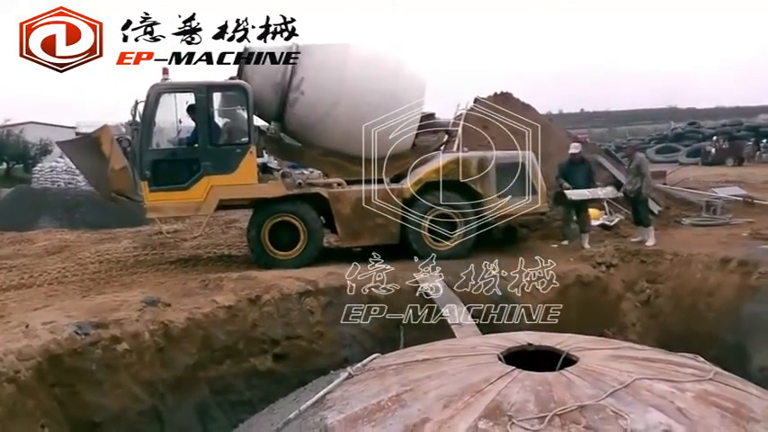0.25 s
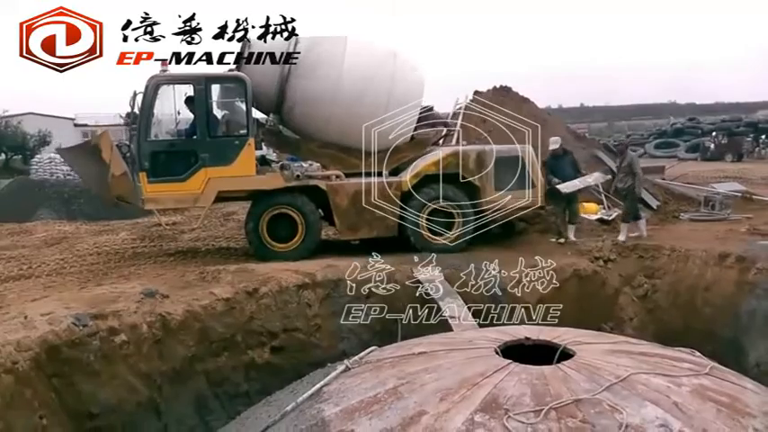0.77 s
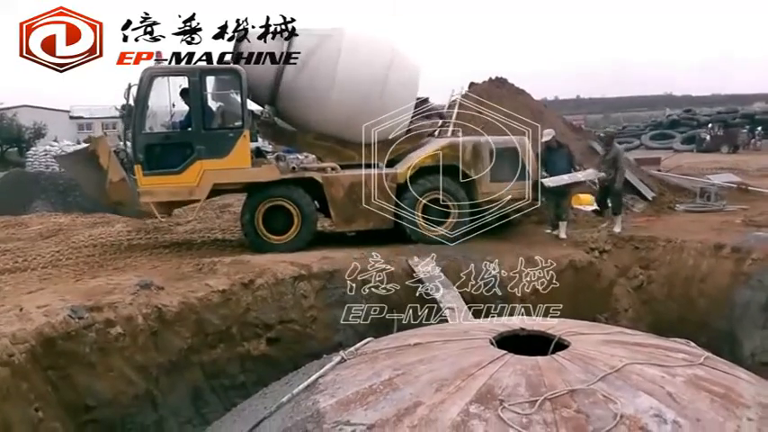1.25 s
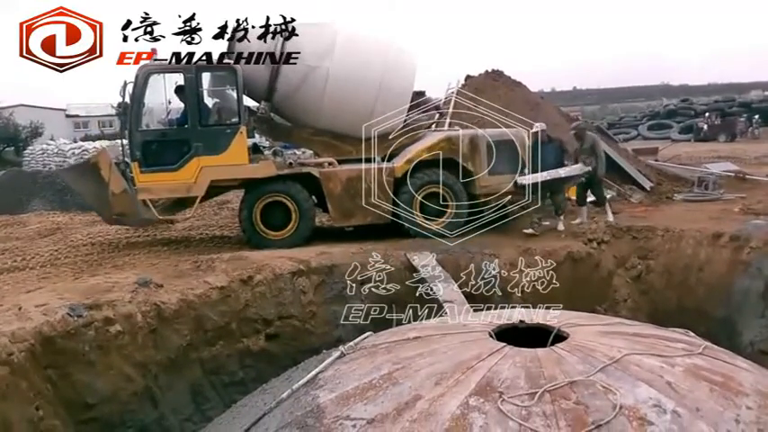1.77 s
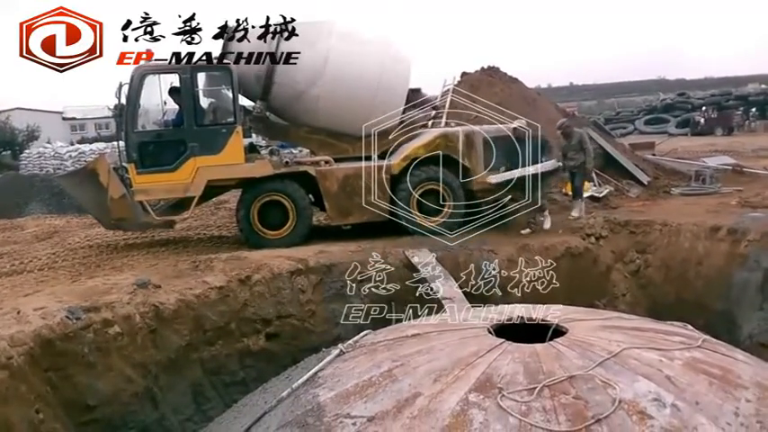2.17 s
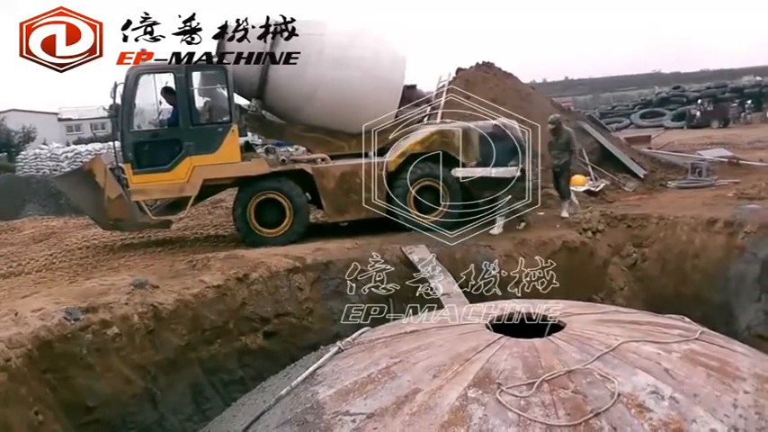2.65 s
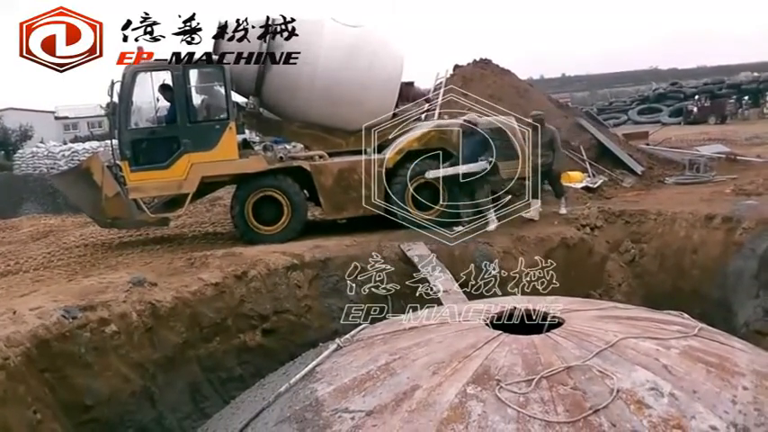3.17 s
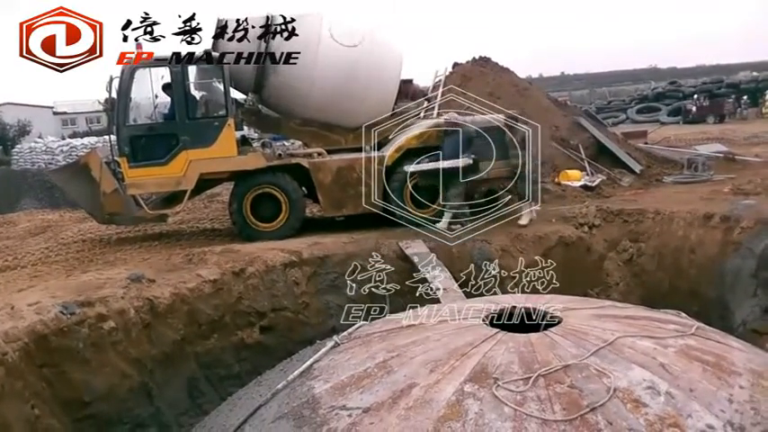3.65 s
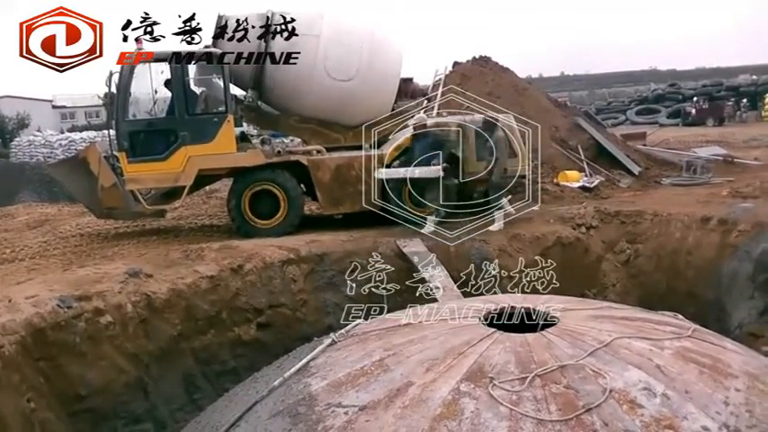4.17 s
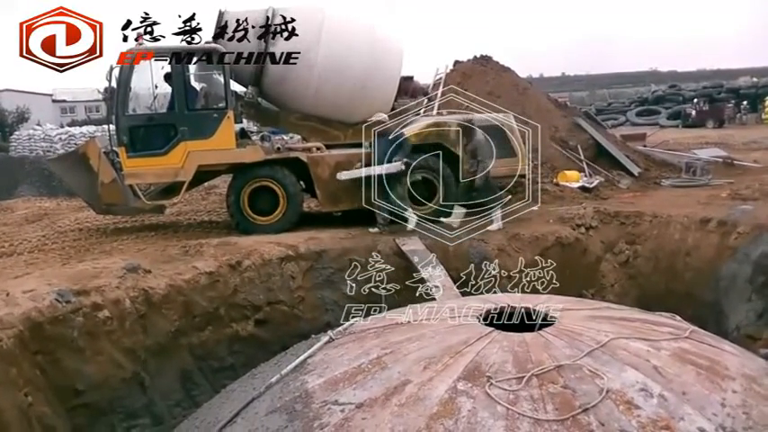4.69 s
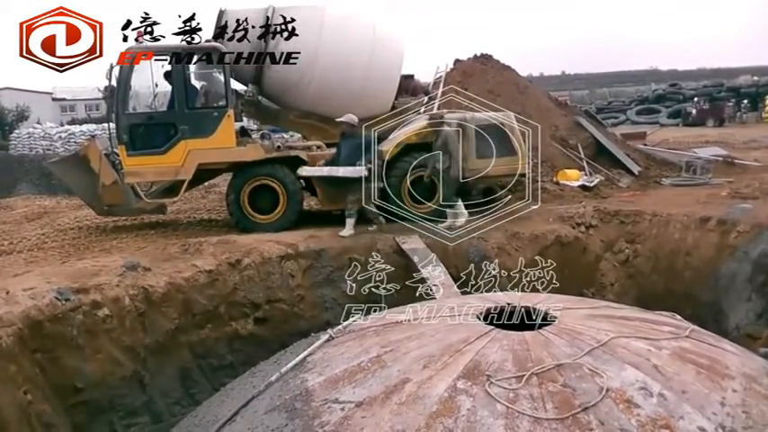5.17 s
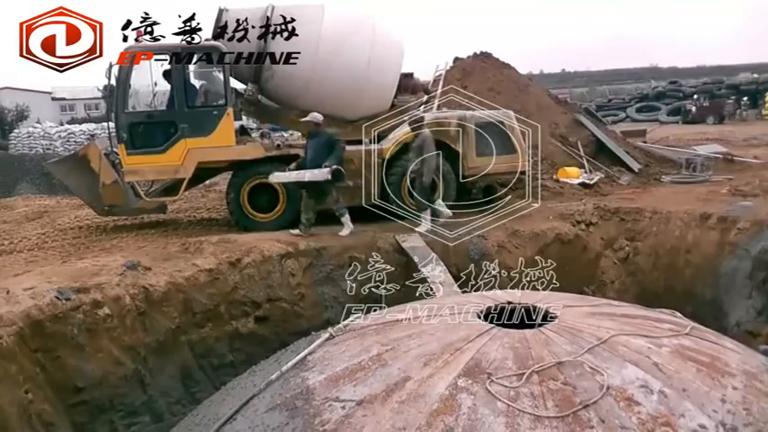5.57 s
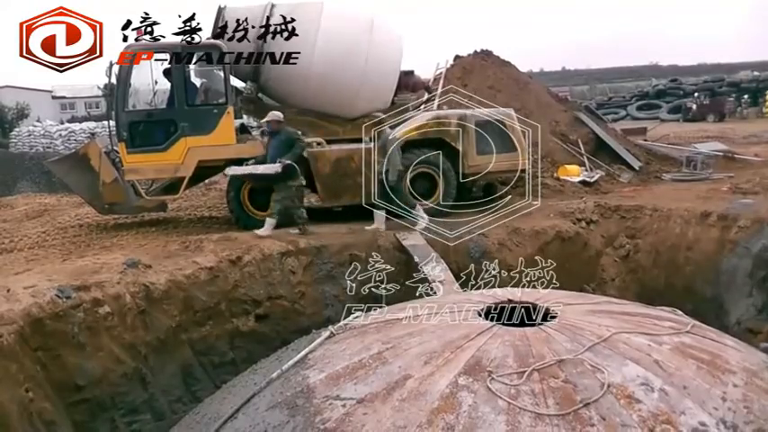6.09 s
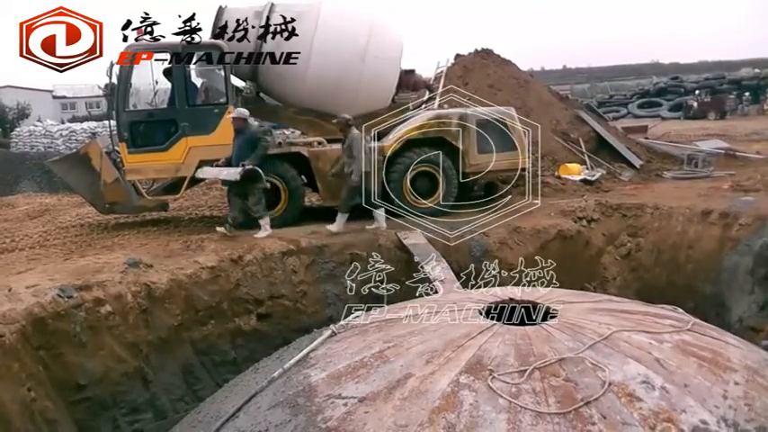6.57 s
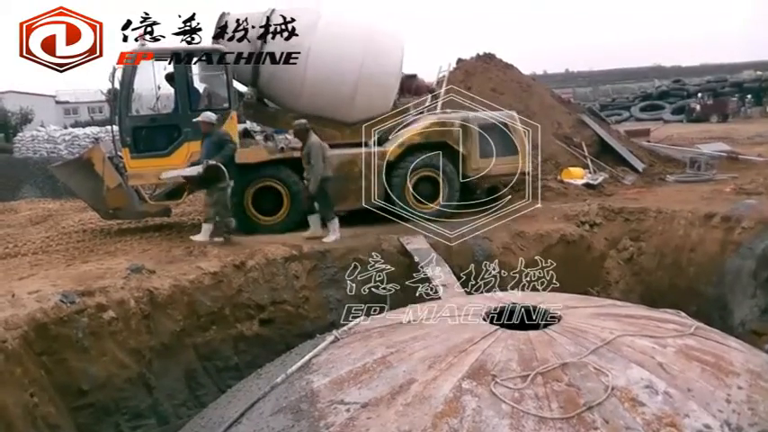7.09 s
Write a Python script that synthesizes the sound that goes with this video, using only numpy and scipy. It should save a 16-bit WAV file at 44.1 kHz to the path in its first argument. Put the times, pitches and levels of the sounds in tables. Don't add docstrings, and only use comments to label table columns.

```python
import sys
import numpy as np
from scipy import signal
from scipy.io import wavfile

SR = 44100
rng = np.random.default_rng(int(sys.argv[2]) if len(sys.argv) > 2 else 0)


def inscribe(sig):
    pcm = np.round(np.clip(np.atleast_2d(sig).T, -1, 1) * 32767)
    wavfile.write(sys.argv[1], SR, pcm.astype(np.int16))


def undo_db(level):
    steps = np.asarray(level, float) / 20
    return 10 ** steps


N = 323694
CHANGE_S = 1.75

# (time [s], level [dB], brightness [dB])
LOAD_FLOW = [(0.0, -34, -5), (0.5, -32.5, -3), (1.55, -32, -8), (1.83, -35, -9), (2.4, -37, -4),
             (2.772, -37.5, 2), (2.785, -33, -5.5), (2.95, -30.5, -9.5), (3.6, -31.5, -6.5),
             (3.9, -34, -12), (4.25, -41.5, -9.5), (4.6, -37.5, -8), (4.85, -37.5, -10), (5.3, -33.5, -4),
             (5.9, -32.5, -5.5), (6.6, -33.5, -10), (7.34, -32.5, -14.5)]


def rms_one(x):
    return x / np.sqrt(np.mean(x ** 2) + 1e-20)


def in_time(rows):
    s, *columns = np.transpose(rows)
    return [np.interp(np.arange(N) / SR, s, column) for column in columns]


def at_hz(points, hz):
    point_hz, value = np.transpose(points)
    return np.interp(np.log(hz), np.log(point_hz), value)


def by_idle(fast, slow):
    return np.interp(np.arange(N) / SR, [CHANGE_S - 0.03, CHANGE_S + 0.03], [fast, slow])


def even(x):
    cut = int(CHANGE_S * SR)
    return x / by_idle(np.std(x[:, :cut]), np.std(x[:, cut:]))


def drift(rate):
    r = np.exp(-80 * np.pi * rate / SR)
    slow = signal.lfilter([1], [1, -2 * r, r * r], rng.standard_normal(N // 40 + 2002))[2000:]
    return np.interp(np.arange(N) / 40, np.arange(len(slow)), rms_one(slow))


def resonate(x, hz, width_hz):
    r = np.exp(-np.pi * width_hz / SR)
    zeros = np.array([1, 0, -1]) * (1 - r * r) / 2
    poles = [1, -2 * r * np.cos(2 * np.pi * hz / SR), r * r]
    return signal.lfilter(zeros, poles, x + 1e-18)


def resonate_twice(x, hz, width_hz):
    return resonate(resonate(x, hz, width_hz), hz, width_hz)


def spread(mid, side, hz):
    # (frequency [Hz], left-right likeness [0-1])
    likeness = [(60, 1), (180, 1), (550, 0.88), (1650, 0.85), (4970, 0.89), (15000, 0.52)]
    # (frequency [Hz], left-right level difference [dB])
    side_lean = [(60, 3), (240, -2.5), (950, -1.0), (3770, -0.5), (15000, 0.5)]
    alike = np.clip(at_hz(likeness, hz), -1, 1)
    half_db = at_hz(side_lean, hz) / 2
    pair = np.sqrt(1 + alike) * mid + np.sqrt(1 - alike) * side * [[1], [-1]]
    return pair * undo_db(np.array([[half_db], [-half_db]]))


def bands(source, level_db, low_hz, high_hz, step, patchy_db, speed):
    out = 0
    edges = low_hz * 2 ** np.arange(0, np.log2(high_hz / low_hz), step)
    for k, (low, high) in enumerate(zip(edges, edges[1:])):
        band = signal.butter(2, [low, high], "band", fs=SR, output="sos")
        mid, side = signal.sosfilt(band, source[k % 2])
        hz = np.sqrt(low * high)
        out = out + undo_db(level_db(hz) + patchy_db * drift(speed)) * spread(mid, side, hz)
    return out


def singing(source, modes, flicker_db):
    out = 0
    for hz, width_hz, fast_db, slow_db in modes:
        mid, side = rms_one(resonate_twice(source, hz, width_hz))
        level_db = by_idle(fast_db, slow_db) + flicker_db * drift(3.1)
        out = out + undo_db(level_db) * spread(mid, side, hz)
    return out


def engine(shake):
    # (time [s], mean firing rate [Hz], governor swing [Hz], firing tone level [dB])
    crank_speed = [
        (0.1, 73.84, 0, -42),
        (1.4, 73.26, 0, -41),
        (1.68, 71.2, -0.5, -42),
        (1.8, 56.6, -1.5, -38.5),
        (2.1, 54.63, 7, -44),
        (5.6, 54.37, 5.5, -41),
        (6.3, 56.35, 4.5, -41.5),
        (7.34, 57.5, 5, -42),
    ]
    # (time [s], level [dB])
    engine_effort = [(0.0, -21), (0.4, -22), (0.47, -25.5), (0.62, -19.5), (1.0, -21), (1.07, -22.5),
                     (1.35, -20.5), (1.7, -21), (1.8, -24), (2.4, -24), (2.75, -22.5), (4.0, -23.5),
                     (5.2, -24.5), (5.5, -22.5), (6.1, -22), (7.34, -22.5)]
    mean_hz, swing_hz, tone_db = in_time(crank_speed)
    hunt, strength = hunting()
    firing_hz = mean_hz + swing_hz * hunt
    surge = strength * hunt
    turn = 2 * np.pi * np.cumsum(firing_hz) / SR + np.array([[0.17], [-0.17]])
    beat = 1.1 * np.cos(turn / 2) + 0.063 * np.cos(turn / 4)

    tone_db = tone_db + 2 * surge + by_idle(0.6, 1.5) * drift(5.0)
    effort_db, flow_db = in_time(engine_effort)[0], in_time(LOAD_FLOW)[0]
    roar_db = effort_db + surge
    clatter_db = -29.5 + 0.62 * (effort_db - effort_db.mean()) + surge
    clatter_db = clatter_db + 0.31 * (flow_db - flow_db.mean()) + 0.39 * heaps()

    out = orders(turn, tone_db)
    out = out + undo_db(roar_db) * exhaust_roar(turn, beat, shake)
    return out + undo_db(clatter_db) * valve_clatter(beat, shake)


def hunting():
    # (time [s], strength [0-2.2])
    governor_surges = [(1.7, 0.1), (1.92, 1.0), (2.2, 0.78), (2.45, 1), (2.66, 0.56), (2.93, 0.87),
                       (3.17, 0.62), (3.38, 0.52), (3.61, 1.3), (3.82, 1.5), (4.101, 0.79), (4.389, 0.91),
                       (4.68, 0.67), (4.96, 2.2), (5.24, 0.22), (5.47, 0.5), (5.75, 2.2), (6.01, 1.5),
                       (6.26, 0.45), (6.479, 0.48), (6.73, 1.3), (6.99, 0.84), (7.269, 1.9), (7.53, 0.72)]
    s, strength = np.transpose(governor_surges)
    t = np.arange(N) / SR
    surge_count = np.interp(t, s, np.arange(len(s)))
    return np.cos(2 * np.pi * surge_count), np.interp(t, s, strength)


def orders(turn, tone_db):
    # (multiple of firing [1], fast idle [dB], hunting idle [dB])
    order_levels = [(.5, -23, -12), (1.5, 3.5, -2.5), (2.01, -6, -12), (2.5, -7, -4.5), (3.0, 0, -10),
                    (3.5, -6, -28), (8.0, -7, -25)]
    tones = np.sin(turn)
    for multiple, fast_db, slow_db in order_levels:
        level_db = by_idle(fast_db, slow_db) + 0.93 * drift(3.2)
        tones = tones + undo_db(level_db) * np.sin(multiple * turn + rng.uniform(0, 5.57))
    return np.sqrt(2) * undo_db(tone_db) * tones * undo_db(np.array([[-0.6], [0.6]]))


def exhaust_roar(turn, beat, shake):
    # (frequency [Hz], density [dB per Hz])
    roar_fast = [(18, -40), (30, -33), (43, -29), (62, -24), (90, -15), (106, -7.5), (134, -10), (172, 1),
                 (241, 1), (279, -2.5), (473, -6), (524, -7.5), (663, -3), (1000, -19.5), (1300, -48),
                 (2200, -120)]
    # (frequency [Hz], density [dB per Hz])
    roar_slow = [(20, -26), (42, -42), (68, -21), (100, -7), (135, -6.5), (172, -3.5), (205, -6.5),
                 (240, -1.5), (272, -5), (310, -3), (510, -9.5), (720, -5), (900, -15.5), (1300, -36)]
    # (frequency [Hz], width [Hz], fast idle [dB], hunting idle [dB])
    booms = [(174, 30, -12, -14), (232, 40, -14, -17), (255, 25, -16, -18), (315, 50, -19, -17)]

    def colour(hz):
        return by_idle(at_hz(roar_fast, hz), at_hz(roar_slow, hz))

    white = rng.standard_normal((2, 2, N))
    gas = white * undo_db(0.5 * beat + 0.5 * drift(17) + 0.39 * shake)
    roar = even(bands(gas, colour, 21.9, 1150, step=0.25, patchy_db=1.22, speed=4.1))
    roar = roar + singing(white[0], booms, flicker_db=1.5)
    firing, part = np.divmod(turn.mean(axis=0) / (2 * np.pi), 1)
    puff_luck_db = 0.7 * rng.standard_normal(N // 100)[firing.astype(int)]
    roar = roar * undo_db(2 * (0.5 - part) + puff_luck_db - 0.5)
    return 0.93 * roar + undo_db(-8.5) * pulses(firing)


def pulses(firing):
    # (frequency [Hz], width [Hz], level [dB])
    pipe_modes = [(235, 101, -0.5), (418, 180, -7), (637, 154, -3), (760, 136, -7)]
    jitter_s, scatter_db = 0.0008, 3
    at = np.flatnonzero(np.diff(firing) > 0)
    luck = rng.standard_normal((N // 100, 2))[:len(at)]
    late = (jitter_s * SR * luck[:, 0]).astype(int)
    clicks = np.zeros(N)
    clicks[np.clip(at + late, 0, N - 1)] = undo_db(scatter_db * luck[:, 1])
    clicks = signal.sosfilt(signal.butter(4, 150, "high", fs=SR, output="sos"), clicks + 1e-18)
    out = 0
    for k, (hz, width_hz, db) in enumerate(pipe_modes):
        out = out + (-1) ** k * undo_db(db) * rms_one(resonate(clicks, hz, width_hz))
    return rms_one(out)


def valve_clatter(beat, shake):
    # (frequency [Hz], density [dB per Hz])
    clatter_colour = [(600, -30), (900, -5.5), (1400, -4.5), (1900, -13), (2300, -12.5), (3200, -13.5),
                      (4500, -17)]
    # (frequency [Hz], width [Hz], fast idle [dB], hunting idle [dB])
    panels = [(1230, 45, -13, -18.5), (1332, 70, -29, -23), (1420, 13, -24.5, -17), (1621, 53, -25, -24.5),
              (1700, 164, -21, -25)]
    knock = rng.standard_normal((2, 2, N)) * undo_db(1.4 * beat + 0.79 * drift(28) + 2.4 * shake)
    clatter = bands(knock, lambda hz: at_hz(clatter_colour, hz), 862, 5000,
                    step=0.382, patchy_db=1.03, speed=7.0)
    return rms_one(clatter) + singing(knock[0], panels, flicker_db=4.0)


def gravel():
    # (frequency [Hz], density [dB per Hz])
    gravel_colour = [(1200, -20), (1800, -3), (2300, 1), (3000, 1), (4500, 0.5), (6500, 0), (7800, -0.5),
                     (9500, -7.5), (11000, -18), (13000, -40)]
    level_db, bright_db = in_time(LOAD_FLOW)
    level_db = level_db + heaps()
    tilt = bright_db - np.mean(bright_db)

    def colour(hz):
        return at_hz(gravel_colour, hz) + tilt * np.clip(np.log2(hz / 5500), 0, 1.2) * 0.83

    sizes = undo_db(2.0 * np.minimum(rng.exponential(1, N), 4))
    lands = rng.random(N) < 1200 * undo_db(2.5 * drift(25)) / SR
    grains = rms_one(sizes * lands)
    grains = signal.lfilter([1], [1, -0.9], grains) * 0.29
    source = rng.standard_normal((2, 2, N)) * (grains + 3.1)
    hiss = bands(source, colour, 1530, 13500, step=0.404, patchy_db=1.6, speed=38.0)
    hiss = signal.sosfilt(signal.butter(6, 10800, fs=SR, output="sos"), hiss)
    return undo_db(level_db + 3.0) * rms_one(hiss)


def heaps():
    # (time [s], rise [dB], half length [s])
    heap_events = [(0.115, -1.5, 0.046), (0.349, 8.5, 0.064), (0.61, 3.5, 0.046), (0.77, 3.5, 0.066),
                   (1.05, 3.5, 0.04), (1.592, 1.5, .06), (1.74, 3.5, 0.046), (1.89, 4.5, 0.059),
                   (1.973, 4, 0.048), (2.09, 3, 0.036), (2.28, 4, 0.092), (2.54, 6, 0.068), (2.8, 6, 0.027),
                   (2.94, 4.5, 0.12), (3.089, 3.5, 0.026), (3.297, 1.5, .06), (3.47, 4, 0.052),
                   (3.665, 3.5, 0.026), (5.0, 0, .06), (5.163, 5, 0.04), (5.224, 8, 0.0096),
                   (5.172, 8, .012), (5.328, 7, .008), (5.266, 5, .006), (2.009, 10, .008),
                   (1.016, 6.5, .012), (1.724, 4.5, .009), (7.018, 3, .01), (5.908, 9, 0.0081),
                   (2.987, 0, .03), (3.095, 1.5, .02), (0.749, 8, 0.016), (1.017, 2, 0.018),
                   (6.502, 2.5, 0.033), (0.387, 5, .02), (2.97, -0.5, .05), (5.086, 7, .015),
                   (5.008, 5, .012), (5.346, 6, 0.035), (5.465, 9, 0.034), (5.62, 7, 0.026),
                   (5.697, 4, 0.054), (5.899, 2.5, 0.073), (6.02, 2.5, 0.033), (6.154, 3, 0.1),
                   (6.474, 4, 0.16), (7.0, 0, 0.033)]
    t, out = np.arange(N) / SR, 0
    for s, rise_db, half_s in heap_events:
        out = out + np.interp(t, [s - 0.98 * half_s, s, s + 0.95 * half_s], [0, rise_db, 0])
    return out


def stones():
    # (time [s], peak [dB], colour [Hz], left-right [dB])
    big_stones = [(0.3317, -7, 6230, -2), (0.3523, -8, 5960, 1), (0.373, -3, 5120, 3),
                  (0.447, -5.5, 6250, 1), (0.743, -3.5, 5500, -4), (0.751, -11, 5000, 0),
                  (1.009, -3.5, 6750, 5), (1.7182, -0.5, 8000, -2), (1.9665, -5, 5800, 1),
                  (2.003, 0, 6340, 2), (2.069, -8, 4980, 8), (2.074, -2.5, 4840, 3),
                  (2.3143, -10.5, 6500, 3), (2.465, -10.5, 7100, 16), (2.4942, -13, 7000, 11),
                  (2.876, -4, 7400, 7), (4.9802, -10, 6060, -1), (5.0032, -10, 6900, -2),
                  (5.0431, -13, 6540, -3), (5.073, -5.5, 5570, -3), (5.075, -5, 4800, 0),
                  (5.163, -2.5, 6500, 9), (5.214, -5, 7440, 8), (5.2228, -3, 6000, 3), (5.223, -5, 3000, 2),
                  (4.978, -12, 7000, 2), (4.982, -10.5, 8000, 0), (1.971, -11, 7000, 0),
                  (5.324, -11, 7280, -11), (5.3418, -7, 7200, -8), (5.4107, -8.5, 6020, -1),
                  (5.622, -5.5, 7500, 2), (5.9005, -9, 5800, -1), (5.903, -9, 5000, 0),
                  (5.225, -8, 7000, 1), (5.96, -3.5, 4150, 4), (6.471, -5, 4500, -2.5),
                  (6.514, -6.5, 5500, 3)]
    # (time [s], peak [dB], colour [Hz])
    small_chips = [(0.2103, -11, 7360), (0.277, -10, 7150), (0.407, -7.5, 6510), (0.4583, -16, 7160),
                   (0.524, -11, 7110), (1.052, -9, 6960), (1.6965, -9, 7840), (1.752, -10, 6200),
                   (1.8053, -17, 7040), (2.0099, -12, 4380), (2.2285, -18, 6440), (2.2733, -9, 6450),
                   (3.2465, -5, 4600), (3.753, -21, 5150), (3.7734, -11, 3940), (3.812, -13, 6336),
                   (4.863, -18, 4060), (5.16, -15, 6940), (5.1746, -7, 7680), (5.263, -12, 8000),
                   (5.4535, -20, 4500), (5.472, -11, 5590), (5.6122, -16, 4560), (5.851, -10, 7500),
                   (5.9465, -20, 6800), (5.1465, -12, 7300), (5.288, -15, 4500), (5.2975, -18, 7000),
                   (4.5615, -39, 4193), (7.011, -23, 7500), (7.0165, -7, 5660), (2.526, -7.5, 7290),
                   (2.7822, -19, 4800), (4.2678, -24, 3750), (4.5996, -22, 3600), (4.8929, -17, 3320),
                   (5.6679, -27, 3230), (6.5609, -17, 3960), (6.8817, -20, 3320), (7.0513, -23, 3590),
                   (7.1526, -17, 3600), (7.193, -26, 4080), (5.448, -13, 9000), (5.332, -12, 8000),
                   (5.368, -15, 4500)]
    rebound_s, rebound_db = 0.0028, -9
    graze_s, graze_db = 0.0046, -21
    chip_scatter_db = 6.5
    hits = list(big_stones)
    for s, peak_db, hz, pan_db in big_stones:
        luck = rng.uniform(0.41, 1.4, 4)
        hits.append((s + rebound_s * luck[0], peak_db + rebound_db * luck[1], hz, pan_db))
        hits.append((s - graze_s * luck[2], peak_db + graze_db * luck[3], hz, pan_db))
    for s, peak_db, hz in small_chips:
        hits.append((s, peak_db, hz, chip_scatter_db * rng.standard_normal()))

    out, t = np.zeros((2, N + 2000)), np.arange(1500) / SR
    shape = np.exp(-t / 0.00036) + 0.17 * np.exp(-t / 0.004)
    for s, peak_db, hz, pan_db in hits:
        noise = rng.standard_normal((3, 1500))
        burst = (noise[0] + 0.48 * noise[1:]) * shape
        burst[:, 0] = 1.6
        body = resonate_twice(burst, hz, 0.75 * hz)
        knock = resonate_twice(burst, 0.69 * hz, 2100)
        crack = body + 0.32 * knock + 0.22 * resonate_twice(burst, 7000, 6500)
        crack = crack / np.max(np.abs(crack.mean(axis=0)))
        at = round(s * SR)
        out[:, at:at + 1500] += undo_db(peak_db - 2.5 + np.array([[0.5], [-0.5]]) * pan_db) * crack
    return signal.sosfilt(signal.butter(4, 10500, fs=SR, output="sos"), out[:, :N])


def spits():
    # (time [s], peak [dB], left-right [dB], upper limit [Hz])
    spit_events = [(0.352, -40, -5, 12300), (0.743, -29, -3, 15600), (0.752, -32, 0, 15600),
                   (1.0093, -18, 2, 13200), (1.018, -26, -3, 13000), (1.2515, -48, 2, 11800),
                   (1.7182, -22, 1, 14000), (1.9665, -33, 0, 15600), (1.971, -34, 0, 15600),
                   (2.003, -31, 1, 15600), (2.074, -37, 2, 15600), (2.465, -39, 10, 15600),
                   (2.775, -38, 0, 15600), (2.876, -35, 7, 15400), (4.9802, -38, -2, 12200),
                   (5.0035, -29, -1, 14800), (5.0431, -28, 0, 14800), (5.073, -26, 3, 15400),
                   (5.163, -16, 15, 12200), (5.215, -30, 5, 13900), (5.324, -35, -1, 12700),
                   (5.332, -34, -4, 12700), (5.4107, -41, -1, 11900), (5.448, -36, 0, 12200),
                   (5.85, -40, 0, 12300), (5.9005, -38, 0, 12100), (7.0163, -45, 1, 11600)]
    out, t = np.zeros((2, N + 1500)), np.arange(1500) / SR
    shape = np.exp(-t / 0.0005) + 0.2 * np.exp(-t / 0.005)
    high_pass = signal.butter(3, 10800, "high", fs=SR, output="sos")
    for s, peak_db, pan_db, top_hz in spit_events:
        noise = rng.standard_normal((3, 1500))
        burst = (noise[0] + 0.67 * noise[1:]) * shape
        burst = signal.sosfilt(high_pass, burst)
        burst = signal.lfilter([1, 0.8], [1], burst)
        burst = signal.sosfilt(signal.cheby1(8, 1, top_hz, fs=SR, output="sos"), burst)
        burst = burst / np.max(np.abs(burst))
        at = round(s * SR)
        out[:, at:at + 1500] += undo_db(peak_db + np.array([[0.5], [-0.5]]) * pan_db) * burst
    return out[:, :N]


def thuds():
    # (time [s], peak [dB], shell mode [Hz])
    thud_events = [(0.119, -5.5, 466), (0.366, 4.5, 725), (0.358, -5, 520), (0.374, -6, 480),
                   (0.381, -5, 700), (0.345, -9, 650), (0.777, -8, 592), (0.81, -4, 590), (0.941, -8, 627),
                   (1.222, -11, 678), (1.326, -11, 584), (0.242, -8, 657), (0.323, -6, 716),
                   (3.322, -6, 312), (3.997, -10, 328), (4.429, -8, 645), (5.393, -9, 312),
                   (5.447, -9, 417), (6.687, -6, 404), (6.999, -9, 740), (0.716, -9, 565), (1.264, -4, 423),
                   (1.367, -2, 340), (1.3685, 1.5, 700), (0.895, -4, 730), (1.918, -5, 760),
                   (2.562, -7, 696), (4.084, -9, 460), (4.98, -5, 710), (5.223, -6, 885), (6.101, -10, 711),
                   (6.578, -9, 446), (0.078, -3, 307), (0.198, 0, 242), (2.768, -6, 237), (3.004, -5, 690),
                   (2.93, -7, 710), (4.655, -3.5, 296), (6.447, -4.5, 237), (6.817, -6, 600)]
    out, t = np.zeros(N + 4000), np.arange(3000) / SR
    recoil = np.maximum(t - 0.004, 0) * np.exp(-np.abs(t - 0.004) / 0.00013)
    blow = t * np.exp(-t / 0.0006) - 0.37 * recoil
    for s, peak_db, hz in thud_events:
        shell = resonate(blow, hz, 73) + 0.45 * resonate(blow, 0.67 * hz, 81)
        ring = resonate(shell, 0.97 * hz, 630)
        at = round(s * SR)
        out[at:at + 3000] += undo_db(peak_db - 10.0) * ring / np.max(np.abs(ring))
    return out[:N]


def rolls():
    # (time of peak [s], peak [dB], shell mode [Hz])
    roll_events = [(.08, -27, 329), (.78, -19.5, 174), (.95, -23.5, 233), (1.0, -18.5, 166),
                   (1.37, -25, 314), (1.68, -20.5, 233), (2.75, -25, 175), (2.95, -20.5, 177.5),
                   (3.85, -25, 206), (4.09, -22.5, 250.8), (4.4, -23.5, 240), (4.66, -25.5, 199),
                   (5.72, -26, 318), (5.85, -23.5, 235), (6.07, -22.5, 183), (6.3, -28, 239),
                   (7.0, -27, 227), (7.279, -25, 153)]
    half_s = 0.044
    out, t = np.zeros(N + 12000), np.arange(-6000, 6000) / SR
    swell = np.exp(-(t / half_s) ** 2)
    for s, peak_db, hz in roll_events:
        at = max(round(s * SR) - 6000, 0)
        out[at:at + 12000] += undo_db(peak_db) * swell * np.sin(2 * np.pi * hz * t)
    return out[:N]


def taps():
    # (time [s], peak [dB], plate mode [Hz])
    tap_events = [(0.1261, -16, 1620), (0.2204, -20, 1690), (0.7356, -22, 1960), (1.646, -10, 1400),
                  (1.7759, -20, 1410), (1.8485, -13, 1650), (2.2902, -23, 1620), (2.365, -13, 1400),
                  (2.4039, -10, 1420), (2.8809, -16, 2850), (3.2111, -22, 1610), (3.4635, -13, 2760),
                  (3.7239, -22, 1440), (4.8563, -12, 1390), (4.9676, -21, 2900), (5.1238, -17, 1440),
                  (5.3068, -22, 1450), (5.3263, -19, 1850), (5.4201, -12, 1520), (5.455, -9, 1426),
                  (5.687, -12, 1610), (5.9005, -11, 1400), (6.3195, -20, 1410), (6.6009, -19, 1420),
                  (6.6383, -15.5, 1520), (6.674, -16.5, 1430), (6.7092, -16.5, 1620), (6.922, -11.5, 1430),
                  (7.0509, -28, 1420), (7.0853, -25, 1630), (7.1198, -13, 1610), (7.154, -9, 1400),
                  (7.1931, -27, 1420), (7.2574, -21, 1700), (7.2874, -9, 1410)]
    width_hz = 330
    out, t = np.zeros(N + 1500), np.arange(1500) / SR
    for s, peak_db, hz in tap_events:
        knock = rng.standard_normal(1500) * np.exp(-t / 0.0036)
        ring = resonate(resonate(knock, hz, width_hz), hz, 3.3 * width_hz)
        at = round(s * SR)
        out[at:at + 1500] += undo_db(peak_db - 7) * ring / np.max(np.abs(ring))
    return out[:N]


def squeaks():
    # (time [s], peak [dB], panel mode [Hz])
    squeak_events = [
        (3.0897, -29, 1360),
        (3.5544, -28, 1420),
        (3.795, -32, 1237),
    ]
    out, t = np.zeros(N + 3000), np.arange(3000) / SR
    swell = t / 0.0062 * np.exp(1 - t / 0.0081)
    for s, peak_db, hz in squeak_events:
        at = round(s * SR)
        out[at:at + 3000] += undo_db(peak_db) * swell * np.sin(2 * np.pi * hz * t)
    return out[:N]


def jolts():
    kicks = (rng.random(N) < 16 / SR) * rng.exponential(1, N)
    decay = np.exp(-1 / (0.012 * SR))
    return np.minimum(signal.lfilter([1], [1, -decay], kicks), 1.6) - 0.3


def scene():
    shake = jolts()
    far = engine(shake) + gravel() * undo_db(1.3 * shake) + stones()
    far = far + thuds() + rolls() + taps() + squeaks()
    return signal.sosfilt(signal.butter(4, 11300, fs=SR, output="sos"), far) + spits()


def duck(x):
    from_db, share, delay_s, release_db_per_s = -10.5, 0.68, 0.0088, 190
    ramp = release_db_per_s * np.arange(N) / SR
    treble = np.diff(x.mean(axis=0), prepend=0)
    over_db = np.maximum(20 * np.log10(np.abs(treble) + 1e-9) - from_db, 0)
    held_db = np.maximum.accumulate(over_db + ramp) - ramp
    r = np.exp(-1 / (delay_s * SR))
    return x * undo_db(-share * signal.lfilter([1 - r], [1, -r], held_db))


def top_cut(x):
    return signal.sosfilt(signal.butter(12, 15710, fs=SR, output="sos"), x)


def record(dry):
    mix = duck(dry)
    return top_cut(mix)


dry = scene()
out = record(dry)
inscribe(out)
```